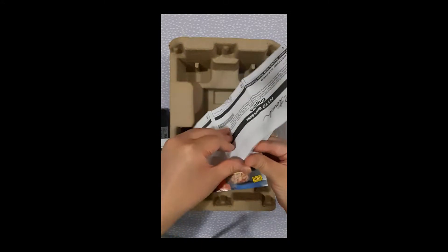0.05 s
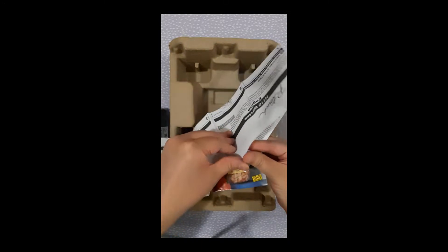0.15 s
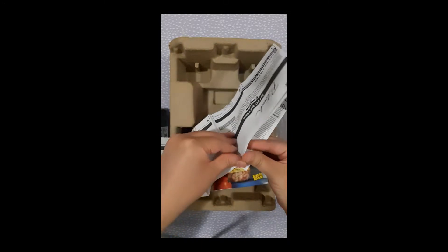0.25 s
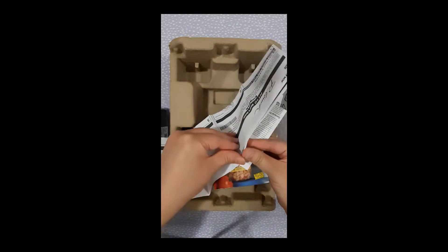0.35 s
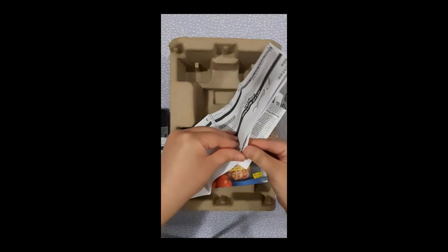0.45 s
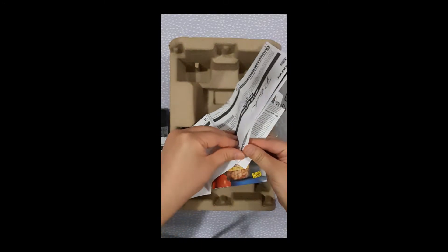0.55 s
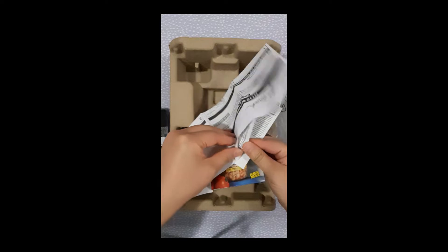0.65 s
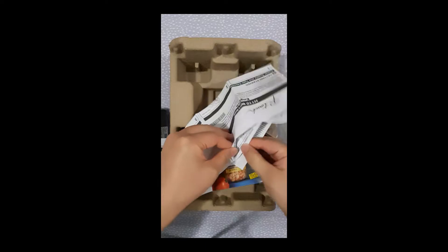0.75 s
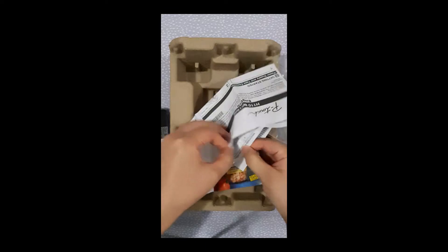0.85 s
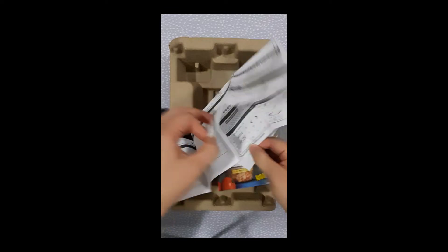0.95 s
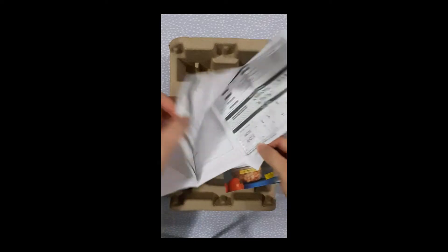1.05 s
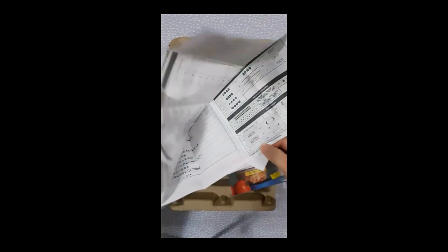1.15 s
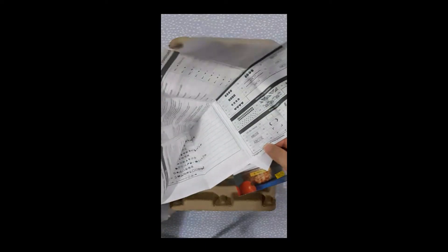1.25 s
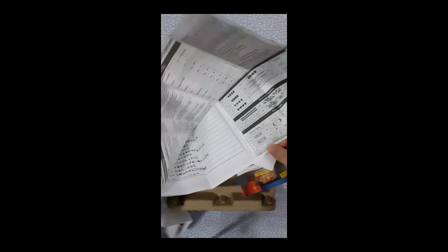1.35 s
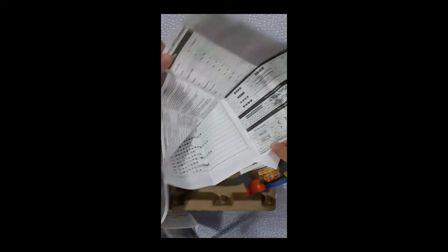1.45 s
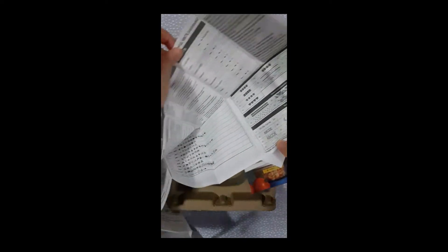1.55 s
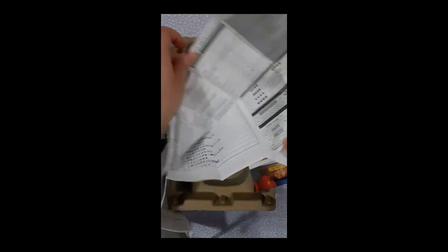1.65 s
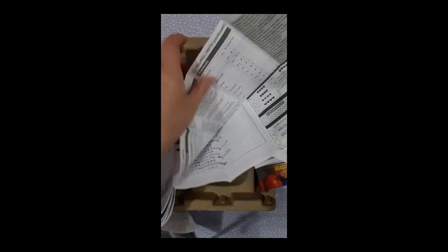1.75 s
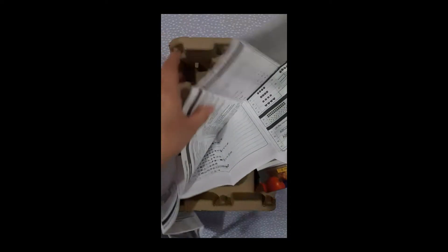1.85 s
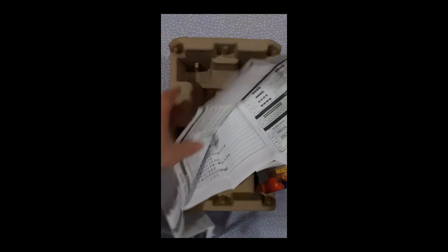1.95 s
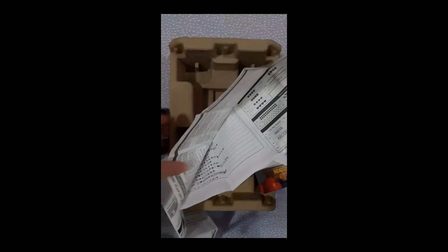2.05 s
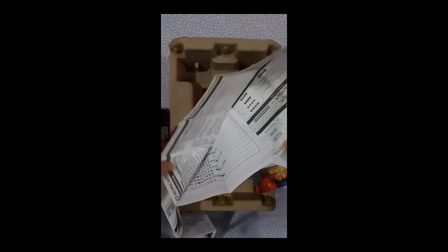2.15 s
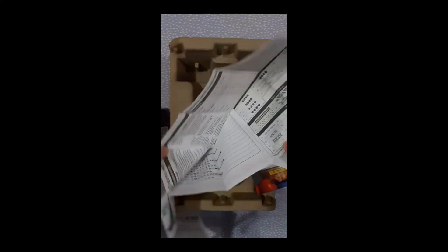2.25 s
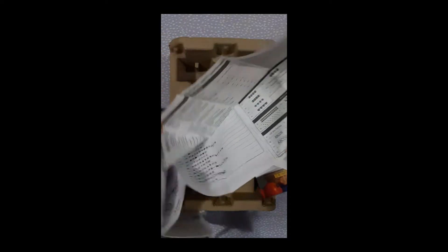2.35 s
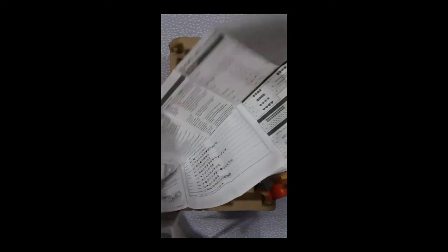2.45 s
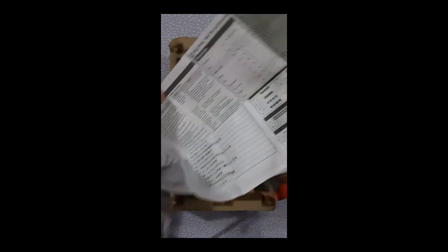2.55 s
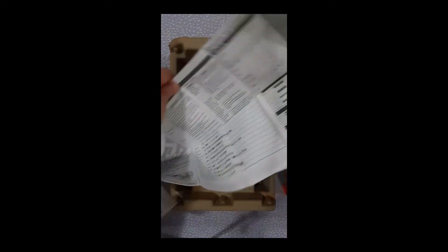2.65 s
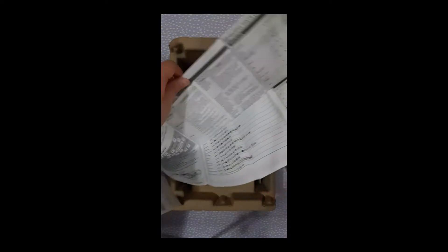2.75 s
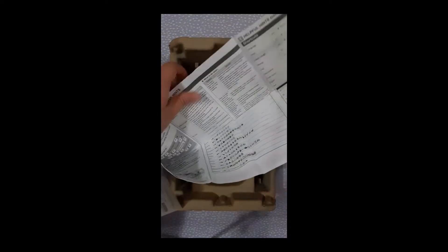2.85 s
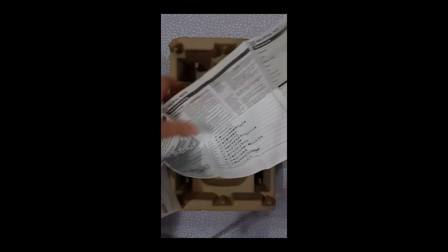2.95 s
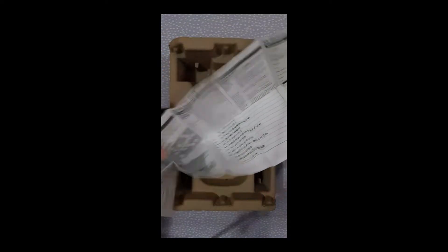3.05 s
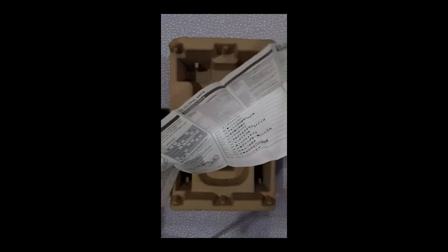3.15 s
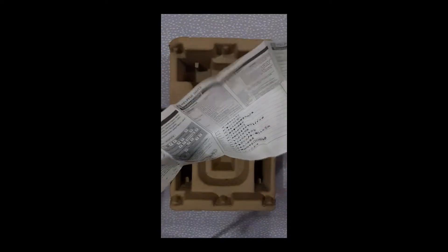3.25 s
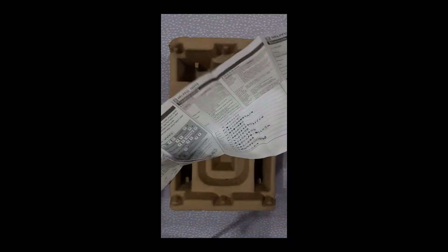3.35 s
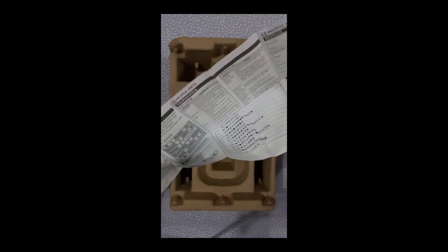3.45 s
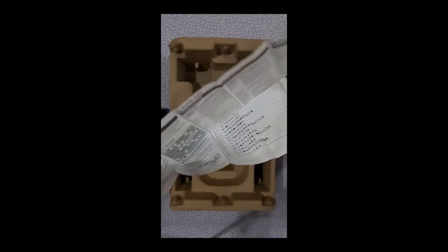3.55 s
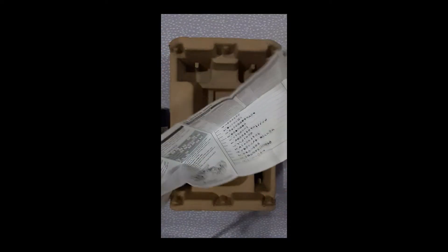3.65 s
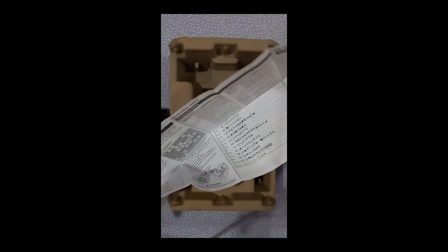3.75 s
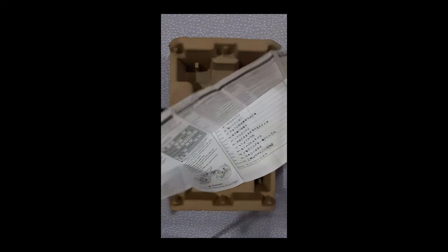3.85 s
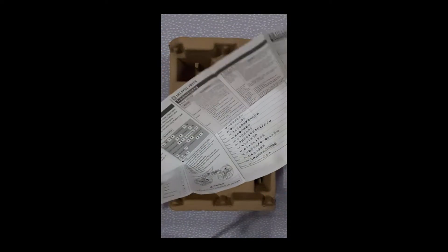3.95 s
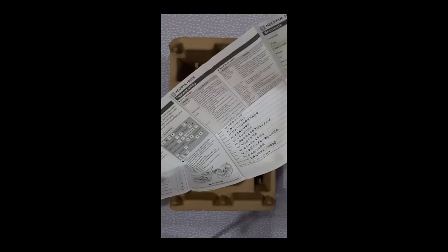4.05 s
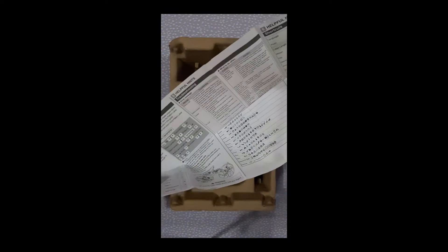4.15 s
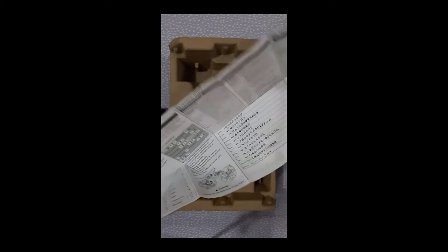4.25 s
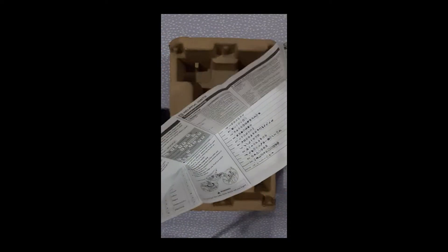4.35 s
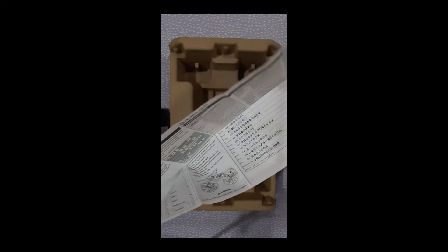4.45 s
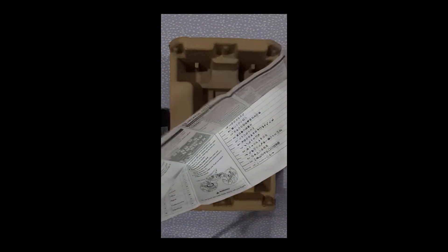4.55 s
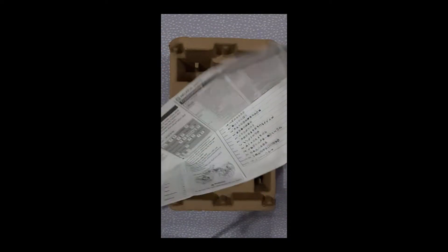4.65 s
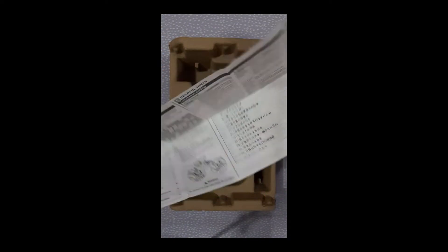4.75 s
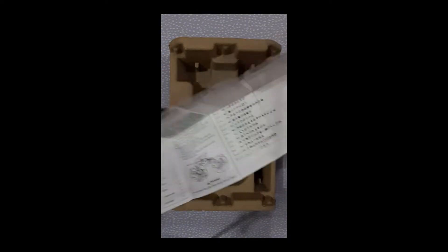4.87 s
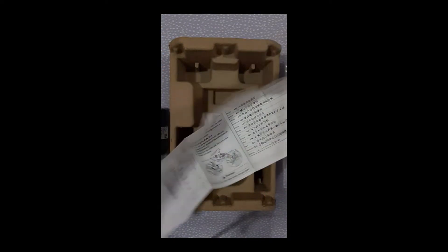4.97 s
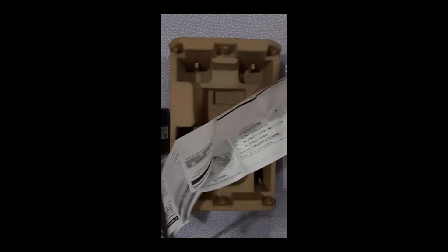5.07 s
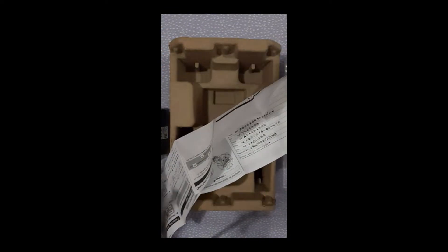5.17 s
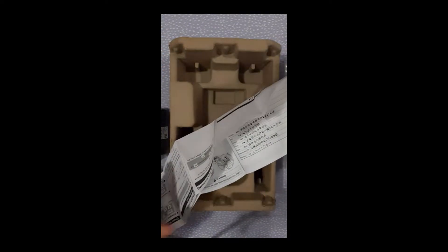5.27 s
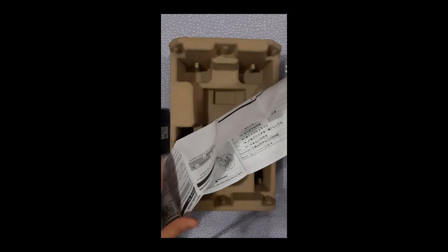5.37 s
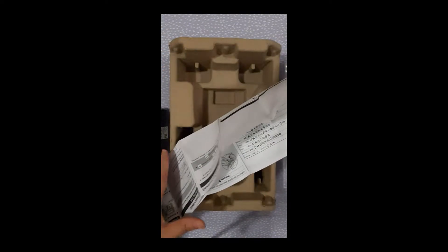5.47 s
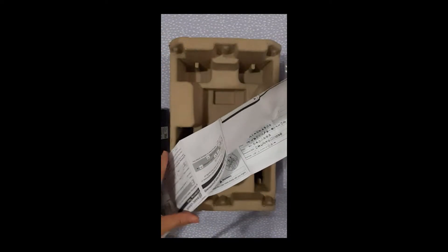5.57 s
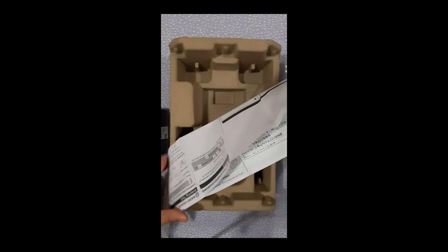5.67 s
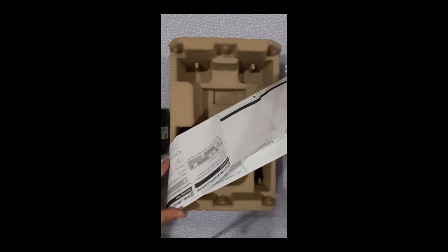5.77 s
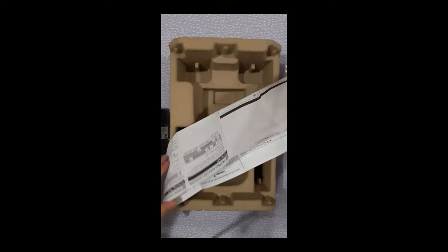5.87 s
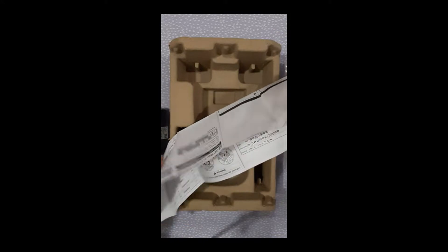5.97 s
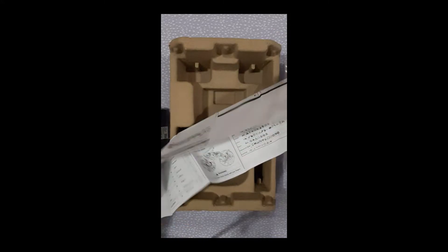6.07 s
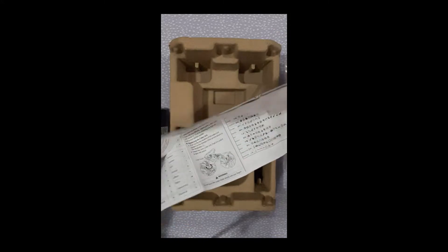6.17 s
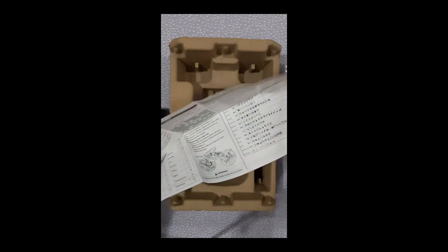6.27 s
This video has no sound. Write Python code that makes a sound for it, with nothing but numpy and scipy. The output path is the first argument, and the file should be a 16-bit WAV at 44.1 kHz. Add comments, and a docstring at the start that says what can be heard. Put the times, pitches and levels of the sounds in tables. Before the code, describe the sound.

Thin paper is handled and opened by hand, very near the microphone, with a short soft room tail and barely audible hush. Tight folds tick first, then broad panels grumble, crinkle and hiss as they bend and slide. Irregular snaps rise above the rustle, two panels flip with a hollow pop, activity drops almost to nothing, and crisp crinkling returns at the end.

```python
"""Unfolding a large paper sheet

Two hands unfold a large, thin sheet close to a two-port microphone in a small room.
Filtered noise makes the rustle: flexing panels grumble, folds crackle, sliding faces hiss.
Creases snap as decaying noise bursts; broad panels fan the air as low band noise.
Twice a whole panel flips with a hollow pop, one pressure pulse. Room tail and faint hush surround it."""
import sys
import numpy as np
from scipy import signal
from scipy.fft import rfft, irfft, next_fast_len
from scipy.io import wavfile
from scipy.ndimage import uniform_filter1d

SR = 44100
rng = np.random.default_rng(int(sys.argv[2]) if len(sys.argv) > 2 else 0)


def wrap_up_sound(samples):
    """Save the sound to the file named by the first command line argument, as 16-bit audio."""
    columns = np.atleast_2d(samples).T
    # keep every value between -1 and 1, then stretch to whole-number steps
    tamed = np.clip(columns, -1, 1)
    steps = np.round(tamed * 32767).astype(np.int16)
    wavfile.write(sys.argv[1], SR, steps)


N = 278271
TIME_S = np.arange(N) / SR


def undb(db):
    """Decibels to amplitude gain."""
    return 10 ** (np.asarray(db) / 20)


def unit(x):
    """Scale to rms 1."""
    return x / np.sqrt(np.mean(x ** 2) + 1e-18)


def colour(x, points, skirt_db=20):
    """Minimum-phase filter through (Hz, dB) points; skirt_db is lost per factor e in Hz outside them."""
    size = next_fast_len(x.shape[-1] + 2048) // 2 * 2
    hz, db = np.transpose(points)
    log_hz = np.log(np.maximum(np.arange(size // 2 + 1) * SR / size, 1))
    outside = np.abs(log_hz - np.clip(log_hz, np.log(hz[0]), np.log(hz[-1])))
    outline_db = np.interp(log_hz, np.log(hz), db) - skirt_db * outside
    # fold the cepstrum onto positive times: causal, minimum phase
    cepstrum = irfft(np.log(undb(outline_db)))
    cepstrum[1:size // 2] *= 2
    cepstrum[size // 2 + 1:] = 0
    response = np.exp(rfft(cepstrum))
    return irfft(rfft(x, size) * response)[..., :x.shape[-1]]


def ports(three, apart):
    """Mix a shared signal with one per microphone port; apart is the unshared part of the power."""
    apart = np.clip(apart, .01, .99)
    return np.sqrt(1 - apart) * three[0] + np.sqrt(apart) * three[1:]


# room hush outline: f/Hz, relative level/dB
AIR_OUTLINE = [(40, -10.5), (105, 7.5), (240, -16.5), (900, -23), (1900, -31), (3000, -6.5), (4500, -38),
               (16000, -31.5)]
AIR_RMS_DB = -69.5


def air():
    """The faint steady hush of the room: coloured noise."""
    hush = ports(rng.standard_normal((3, N)), apart=0.32)
    return unit(colour(hush, AIR_OUTLINE)) * undb(AIR_RMS_DB)


def crackle(rate_hz, spread_db, t60_s, smooth):
    """Random tiny buckles of very unequal size, each a short decaying shiver, over a smooth rub."""
    size = undb(spread_db * np.minimum(rng.exponential(size=N), 4))
    kicks = (rng.random(N) < rate_hz / SR) * size ** 2
    decay = np.exp(-2 * np.log(1000) / (t60_s * SR))
    power = signal.lfilter([1], [1, -decay], kicks)
    # level out over 0.1 s
    power = power / (uniform_filter1d(power, size=4410) + 1e-9) + abs(smooth)
    return np.sqrt(power) * rng.standard_normal((3, N))


def flicker(x, depth_db, width_bins, hold_frames):
    """The bending sheet keeps changing its resonances: narrow bands rise and sink at random."""
    spectrum = signal.stft(x, nperseg=512)[2]
    field = rng.standard_normal(spectrum.shape[1:])
    field = uniform_filter1d(field, width_bins, axis=0)
    field = unit(uniform_filter1d(field, hold_frames, axis=1))
    return unit(signal.istft(spectrum * undb(depth_db * field))[1][:, :N])


def grip(rate_hz, depth_db):
    """Paper catches and slips: the level steps at random, over unequal spells."""
    fit = np.cumsum(rng.random(N) < rate_hz / SR)
    db = depth_db * np.clip(rng.standard_normal(N), -2, 1)[fit]
    return unit(uniform_filter1d(undb(db), size=300))


# continuous handling of the sheet: t/s, effort level/dB
EFFORT = [(0.1, -57.5), (0.2, -69), (0.68, -67.5), (0.8, -54.5), (1.08, -66), (1.2, -52), (1.49, -52),
          (1.75, -47), (2.3, -51), (2.75, -49.5), (3.15, -45), (3.7, -49), (3.98, -48), (4.2, -69),
          (4.78, -42), (4.9, -50.5), (5.06, -47), (5.28, -69), (5.56, -79), (5.72, -53), (6.02, -65.5),
          (6.16, -46.5)]
# single pulls and swishes: start t/s, length/s, level/dB, slip/dB (>0 sliding, <0 bending)
STROKES = [(0.076, 0.058, -47, -7), (0.218, 0.018, -55.5, 4), (0.63, 0.14, -63, -12),
           (0.72, 0.099, -44.5, 0), (0.935, 0.056, -57.5, 1), (1.114, 0.026, -46.5, -2),
           (1.58, 0.4, -54.5, 5.5), (1.972, 0.076, -40.5, 1.5), (2.05, 0.23, -54.5, 10.5),
           (2.478, 0.039, -41, 1), (2.783, 0.072, -40, -1.5), (2.95, 0.071, -41.5, 0.5),
           (3.088, 0.029, -34, 3.5), (3.87, 0.14, -47.5, 0.5), (4.02, 0.14, -53, 2),
           (4.219, 0.12, -56, 5.5), (4.319, 0.11, -49.5, 3), (4.47, 0.042, -45, -2.5),
           (4.871, 0.083, -45, 7.5), (4.978, 0.029, -30.5, -5), (5.079, 0.085, -47, -4.5),
           (5.41, 0.19, -77, -9.5), (5.612, 0.093, -54, -3.5), (5.711, 0.041, -48.5, -2.5),
           (5.888, 0.05, -49.5, 0), (6.03, 0.041, -57, 12), (6.17, 0.11, -59, 10)]
STROKE_ATTACK_S, STROKE_RELEASE_TAU_S = 0.014, 0.019
HANDLING_SLIP_DB = -0.5  # bends slightly more than it slides
FLEX_TRIM_DB, CRINKLE_TRIM_DB, SLIDE_TRIM_DB = 1, 1, -3.5
# folded bundle is too stiff to flex much; ramps to 0 dB as it opens
FOLDED_FLEX_DB, OPENING_S, OPEN_S = -12, 0.44, 1.26


def handling():
    """Flex, crinkle and slide levels in dB: effort raises all, slip trades flexing for sliding."""
    moves = [(undb(np.interp(TIME_S, *np.transpose(EFFORT))), HANDLING_SLIP_DB)]
    for start_s, length_s, db, slip_db in STROKES:
        attack = np.clip((TIME_S - start_s) / STROKE_ATTACK_S, 0, 1)
        release = np.exp(-np.maximum(TIME_S - start_s - length_s, 0) / STROKE_RELEASE_TAU_S)
        moves.append((undb(db) * attack * release, slip_db))
    power = sum(np.outer(undb([-slip_db, 0, slip_db]), gain) ** 2 for gain, slip_db in moves)
    flex_db, crinkle_db, slide_db = 10 * np.log10(power)
    folded_db = np.interp(TIME_S, [OPENING_S, OPEN_S], [FOLDED_FLEX_DB, 0])
    return flex_db + FLEX_TRIM_DB + folded_db, crinkle_db + CRINKLE_TRIM_DB, slide_db + SLIDE_TRIM_DB


# bending panels: f/Hz, relative density/dB per Hz
FLEX_OUTLINE = [(90, -13.5), (160, -8), (225, -6), (290, -8.5), (425, 1.5), (560, -1.5), (760, 3.5),
                (1500, -3.5), (2100, -13)]
# small buckles along the folds: f/Hz, relative density/dB per Hz
CRINKLE_OUTLINE = [(900, -13.5), (1600, -5.5), (3200, 1.5), (4800, -4.5), (6000, -8), (7500, -20)]
# rubbing fibres: f/Hz, relative density/dB per Hz
SLIDE_OUTLINE = [(4200, -22), (6000, -3), (6900, 3), (8000, -2.5), (10000, 0), (12500, -11.5),
                 (16000, -10.5)]
FIZZ_PER_SLIDE, FIZZ_DB = 0.59, -4  # dB per dB that slide exceeds flex; offset


def rustle():
    """Panels grumble, folds crinkle, faces hiss; top fizz grows as sliding outweighs flexing."""
    flex_db, crinkle_db, slide_db = handling()
    flex = ports(crackle(rate_hz=170, spread_db=3.0, t60_s=0.06, smooth=0.34), apart=0.21)
    crinkle = ports(crackle(rate_hz=260, spread_db=6.5, t60_s=0.044, smooth=1.0), apart=0.91)
    slide = ports(crackle(rate_hz=1700, spread_db=4.0, t60_s=0.023, smooth=1.0), apart=0.12)
    fizz = colour(ports(rng.standard_normal((3, N)), apart=0.41), [(8000, -22.5), (14500, -5)])
    flex = flicker(colour(flex, FLEX_OUTLINE), 2.5, width_bins=5, hold_frames=7)
    crinkle = flicker(colour(crinkle, CRINKLE_OUTLINE), 2.5, width_bins=5, hold_frames=7)
    slide = flicker(colour(slide, SLIDE_OUTLINE), 2.5, width_bins=5, hold_frames=7)
    # larger, lower buckles give way only when the panels really bend
    highpass = signal.butter(4, 2500, "highpass", fs=SR, output="sos")
    thin = signal.sosfiltfilt(highpass, crinkle)
    crinkle = thin + (crinkle - thin) * np.minimum(undb(flex_db - crinkle_db + 6), 1)
    fizz_gain = np.minimum(undb(FIZZ_PER_SLIDE * (slide_db - flex_db) + FIZZ_DB), 1)
    hiss = slide + fizz / np.std(fizz) * fizz_gain * undb(1.5)
    paper = flex * undb(flex_db) + crinkle * undb(crinkle_db) + hiss * undb(slide_db + 0.5)
    return paper * grip(rate_hz=40, depth_db=2)


def strain(rise_db, tau_s):
    """Gain that swells towards each tabled snap and drops back as the crease lets go."""
    next_snap_s = np.append(np.sort(np.array(SNAPS)[:, 0]), np.inf)
    wait_s = next_snap_s[np.searchsorted(next_snap_s, TIME_S)] - TIME_S
    return undb(rise_db * np.exp(-wait_s / tau_s))


SMALL_PER_S, SMALL_OVER_EFFORT_DB, SMALL_SPREAD_DB = 12, 8.5, 2.5
SMALL_BRIGHT_DB, SMALL_BRIGHT_SPREAD_DB = -2, 6


def minor_creases():
    """Minor creases give way at random, louder with the handling effort; rows as in SNAPS."""
    times_s = np.cumsum(rng.exponential(size=200)) / SMALL_PER_S + .01
    size, shade = rng.standard_normal((len(times_s), 2)).T
    effort_db = np.interp(times_s, *np.transpose(EFFORT))
    db = effort_db + SMALL_OVER_EFFORT_DB + SMALL_SPREAD_DB * np.minimum(size, 1.5)
    bright_db = SMALL_BRIGHT_DB + SMALL_BRIGHT_SPREAD_DB * shade
    return [row for row in zip(times_s, db, bright_db) if row[0] < TIME_S[-1]]


def shiver(t, t60_s, points, apart, rise_s, tail_db, tail_t60_s):
    """Bending waves from one snap cross the sheet and die; rms 1 over the first 8 ms."""
    fall = undb(-60 * t / t60_s) + undb(tail_db - 60 * t / tail_t60_s)
    rise = 1 - np.exp(-(t / rise_s) ** 2)
    wave = colour(ports(rng.standard_normal((3, len(t))), apart) * fall * rise, points)
    return wave / np.sqrt(np.mean(wave[:, t < .008] ** 2, axis=1, keepdims=True))


# creases snapping through: t/s, level/dB, brightness/dB (>0 tight folds, <0 slack panels)
SNAPS = [(0.0925, -39, 6.5), (0.4107, -42.5, 11.5), (0.5307, -43, 13), (0.6286, -46, -34),
         (0.7216, -23, 12), (0.942, -45.5, 3.5), (1.037, -44.5, -13), (1.08, -40, -5.5), (1.1628, -35, -13),
         (1.1814, -31, -1), (1.209, -26.5, -3), (1.2536, -31, 3.5), (1.2964, -35.5, -19), (1.4098, -36, -9),
         (1.5407, -31.5, 1), (1.8209, -33, 0.5), (1.9285, -28.5, -0.5), (2.1622, -35, -11),
         (2.3798, -30.5, -2.5), (2.509, -25.5, -1), (2.5532, -33.5, -10.5), (2.602, -31, -3.5),
         (2.6272, -36.5, 1), (2.9032, -28, 3.5), (3.0796, -22.5, 7), (3.1464, -24, 4.5), (3.151, -23.5, -2),
         (3.1767, -29.5, -5), (3.193, -23.5, -5.5), (3.2281, -31, 0), (3.262, -31.5, -3.5),
         (3.3434, -28, -16), (3.3914, -29, -0.5), (3.4731, -32.5, -5), (3.7482, -38, -5.5),
         (3.8267, -33.5, -7), (3.8695, -17, 6.5), (3.8746, -19, 10.5), (3.9511, -30.5, -9),
         (3.9807, -24, 1), (4.469, -37.5, -2), (4.6322, -33.5, -2), (4.7186, -34, -3), (4.8045, -31, -3),
         (4.9712, -20, 4), (4.9897, -16, 0), (5.0817, -29.5, -5.5), (5.1265, -28, 3), (6.0265, -22, 9),
         (6.0594, -32, 5.5), (6.1132, -32, 4), (6.1339, -23.5, 8), (6.166, -23.5, 4.5)]
SNAP_BASS_DB, SNAP_TREBLE_DB = -4, -10.5  # re middle, at brightness 0
BASS_PER_BRIGHT, TREBLE_PER_BRIGHT = 0.91, 1.16  # dB bass lost, dB treble gained per dB brightness
SNAP_BASE_T60_S, T60_HALVING_DB = 0.016, 28  # at brightness 0; brightness that halves it


def snaps():
    """Each crease lets go at once: three noise bands burst and decay, the treble fastest."""
    out, t = np.zeros((2, N + SR)), np.arange(SR // 10) / SR
    for start_s, db, bright_db in SNAPS + minor_creases():
        t60_s = SNAP_BASE_T60_S * 2 ** (-bright_db / T60_HALVING_DB)
        bass_db = SNAP_BASS_DB - BASS_PER_BRIGHT * bright_db
        treble_db = SNAP_TREBLE_DB + TREBLE_PER_BRIGHT * bright_db
        weights = unit(undb([bass_db, 0, treble_db])) / np.sqrt(3)  # powers sum to 1
        bass = shiver(t, t60_s * 1.5, FLEX_OUTLINE, apart=0.06,
                      rise_s=0.00043, tail_db=-14.5, tail_t60_s=0.16)
        middle = shiver(t, t60_s * 1.1, CRINKLE_OUTLINE, apart=0.82,
                        rise_s=0.00042, tail_db=-24.0, tail_t60_s=0.18)
        treble = shiver(t, t60_s * 0.93, SLIDE_OUTLINE, apart=0.26,
                        rise_s=0.000093, tail_db=-27.5, tail_t60_s=0.17)
        snap = weights[0] * bass + weights[1] * middle + weights[2] * treble
        balance_db = np.array([[1], [-1]]) * rng.normal(0, 1)
        start = int((start_s - .0003) * SR)
        out[:, start:start + len(t)] += snap * undb(db + balance_db)
    return out[:, :N]


# whole panels fanning the air: centre t/s, half length/s (to 1/e), f/Hz, level/dB
SWINGS = [(1.272, 0.13, 178, -46.5), (2.572, .04, 139, -50), (2.725, 0.13, 82.5, -56)]


def swings():
    """Broad panels push the air in soft, low flutters: swelling band noise."""
    out = np.zeros(N)
    for centre_s, half_s, hz, db in SWINGS:
        band = signal.butter(2, [hz / 1.4, hz * 1.4], "bandpass", fs=SR, output="sos")
        swell = np.exp(-np.minimum(((TIME_S - centre_s) / half_s) ** 2, 20))
        flutter = signal.sosfilt(band, rng.standard_normal(N)) * swell
        out += undb(db) * flutter * np.sqrt(np.sum(swell ** 2) / np.sum(flutter ** 2))
    return out


# whole panels flipping: t/s, peak level/dB, air pulse f/Hz
POPS = [(2.6022, -14.5, 1920), (5.0754, -6.5, 800)]


def pops():
    """A flipping panel shoves the air once: a dip in pressure between two humps."""
    out = np.zeros(N)
    for centre_s, db, hz in POPS:
        u = np.minimum((np.pi * hz * (TIME_S - centre_s)) ** 2, 50)
        out += undb(db) * (2 * u - 1) * np.exp(-u)
    return np.array([out, out])


def room_noise(t, apart, points, t60_s):
    """One band of wall reflections: coloured noise decaying 60 dB in t60_s."""
    noise = ports(rng.standard_normal((3, len(t))), apart)
    return colour(noise, points) * undb(-60 * t / t60_s)


def room(x, wet_db, t60_low_s, t60_high_s):
    """The soft tail of the walls, by convolution; the treble dies sooner."""
    t = np.arange(SR // 2) / SR
    low = room_noise(t, 0.56, [(150, -0.5), (3200, -2.5), (6000, -4.5), (16000, -22)], t60_low_s)
    high = room_noise(t, 0.83, [(2500, -19.5), (7000, -4.0), (16000, 4.5)], t60_high_s)
    onset = np.minimum(t / 0.015, 1)
    tail = unit((low + high) * onset) * undb(wet_db) / np.sqrt(len(t))
    return x + signal.fftconvolve(x, tail, axes=1)[:, :N]


# position of the handled part: t/s, left minus right level/dB
PLACE = [(4.5, 0.5), (5.0, -0.5), (6.05, -1.5)]


def scene():
    """The sheet, panned as it moves, in its room."""
    pan_db = np.interp(TIME_S, *np.transpose(PLACE))
    paper = rustle() * strain(rise_db=1.0, tau_s=0.039) + snaps() + swings() + pops()
    paper = paper * undb(np.array([pan_db, -pan_db]) / 2)
    return room(paper, wet_db=-13.0, t60_low_s=0.28, t60_high_s=0.14) + air()


# port mismatch: f/Hz, left minus right level/dB
PORT_MISMATCH = [(400, 0), (2000, 4), (12000, -2.5)]
# stereo width: f/Hz, side gain/dB
SIDE_GAIN = [(1000, 0), (2300, -1), (5000, 1.5), (7000, 1), (16000, -5)]
TOP_HZ = 16000


def record(dry):
    """Two microphone ports of unequal colour, width shaped by band, low-passed at TOP_HZ."""
    left, right = [colour(x, [(hz, sign * db / 2) for hz, db in PORT_MISMATCH], skirt_db=0.5)
                   for x, sign in zip(dry, (1, -1))]
    mid, side = (left + right) / 2, (left - right) / 2
    side_db = np.interp(np.fft.rfftfreq(N, 1 / SR), *np.transpose(SIDE_GAIN))
    side = irfft(rfft(side) * undb(side_db), N)
    lowpass = signal.ellip(10, .2, 80, TOP_HZ, fs=SR, output="sos")
    return signal.sosfilt(lowpass, [mid + side, mid - side])


dry = scene()
out = record(dry)
wrap_up_sound(out)
```